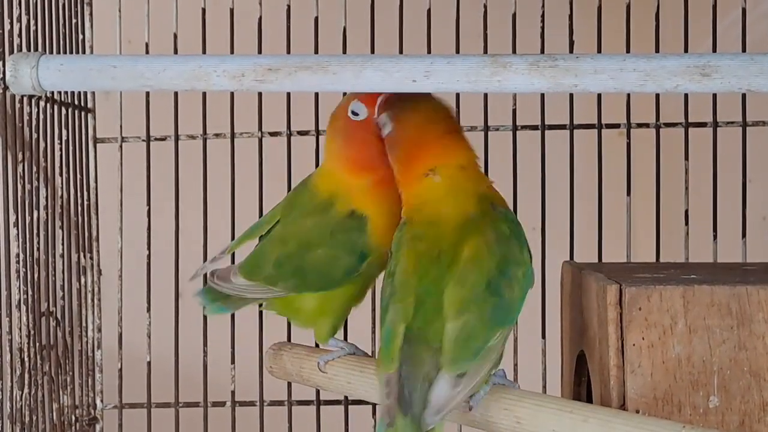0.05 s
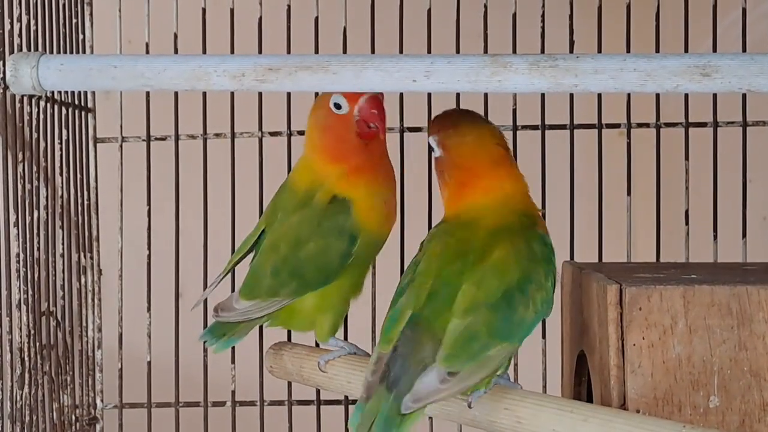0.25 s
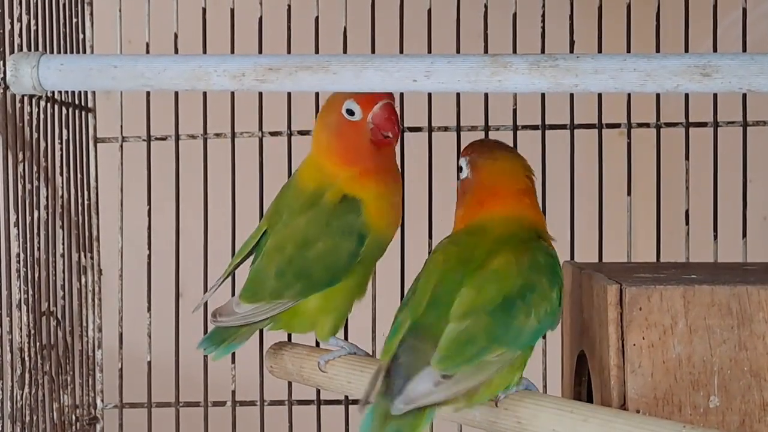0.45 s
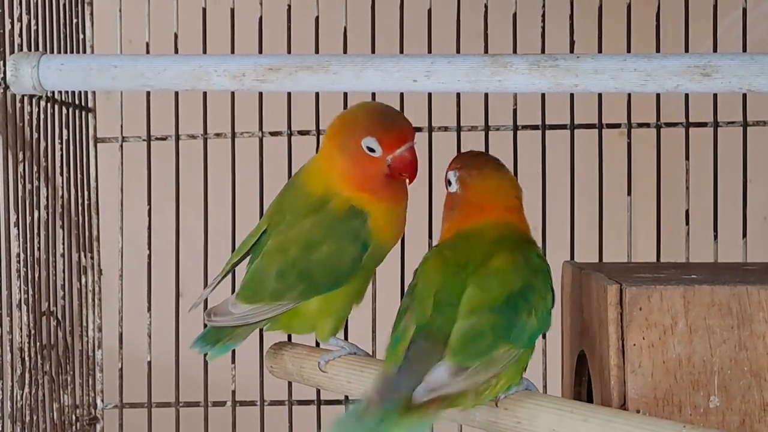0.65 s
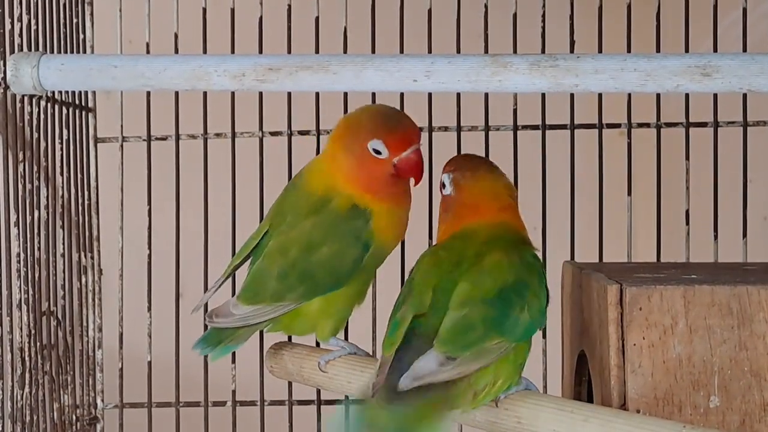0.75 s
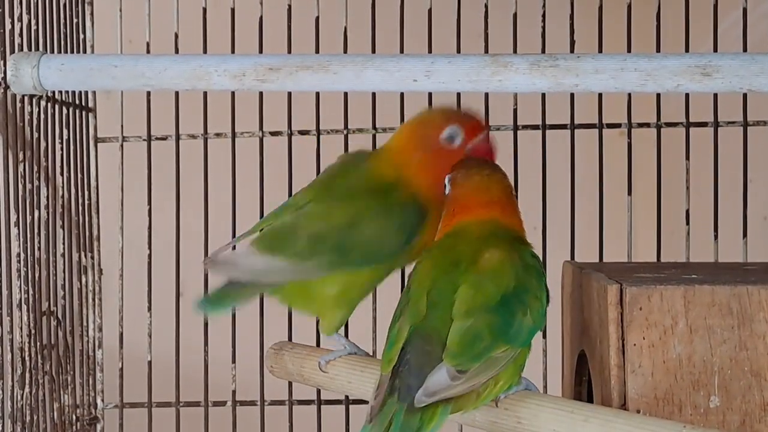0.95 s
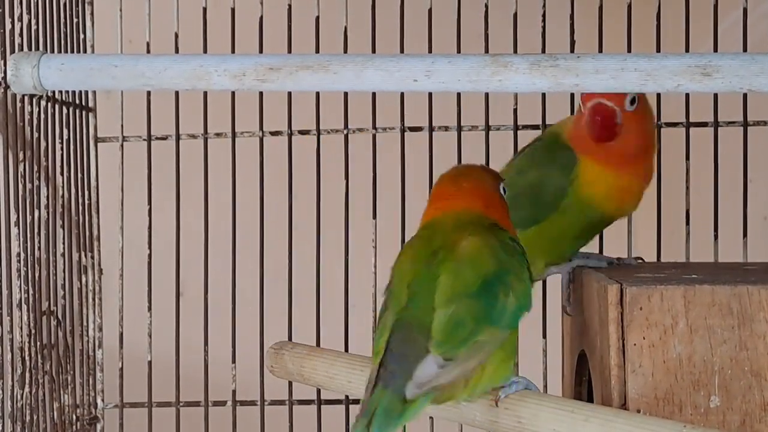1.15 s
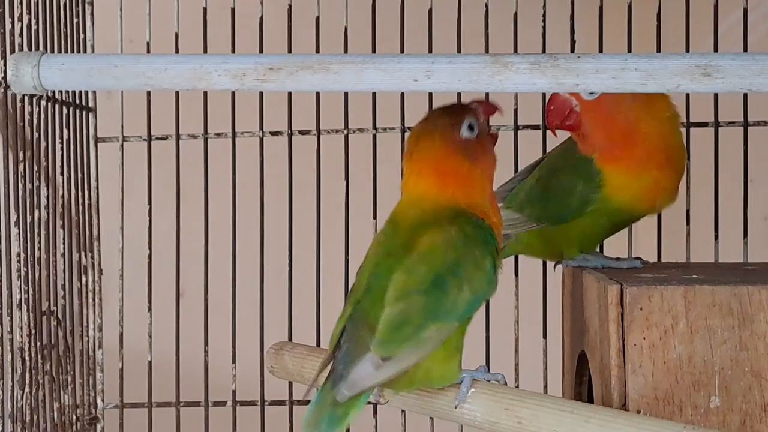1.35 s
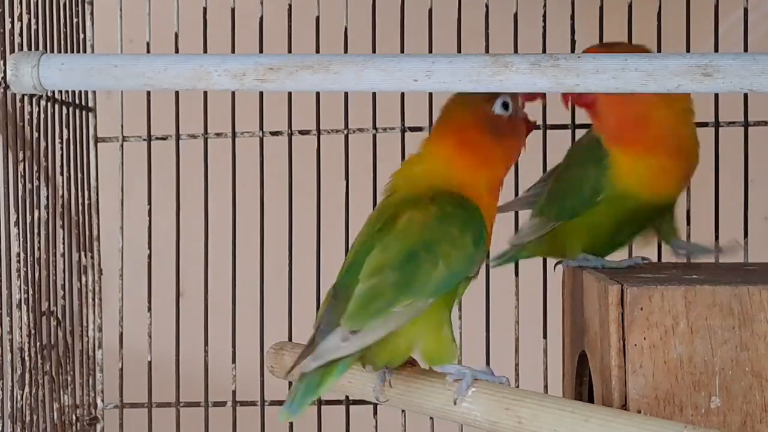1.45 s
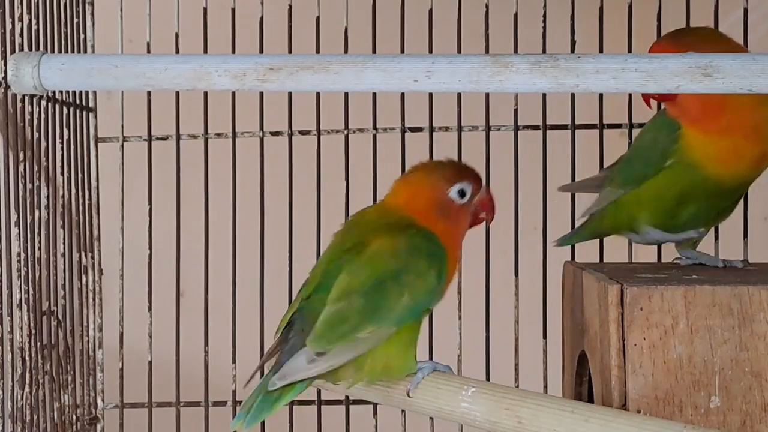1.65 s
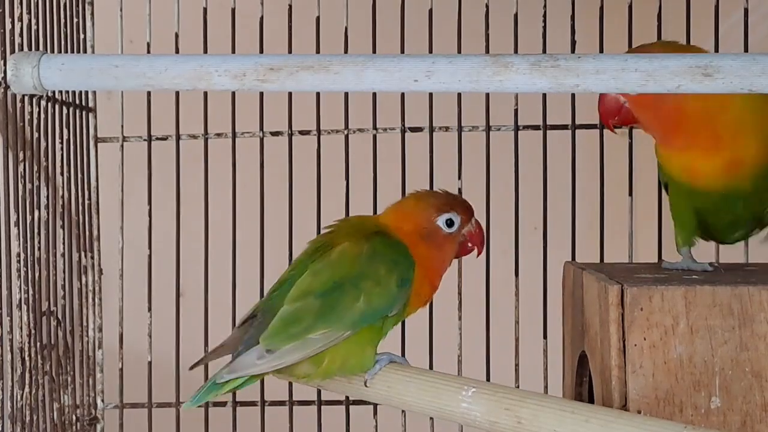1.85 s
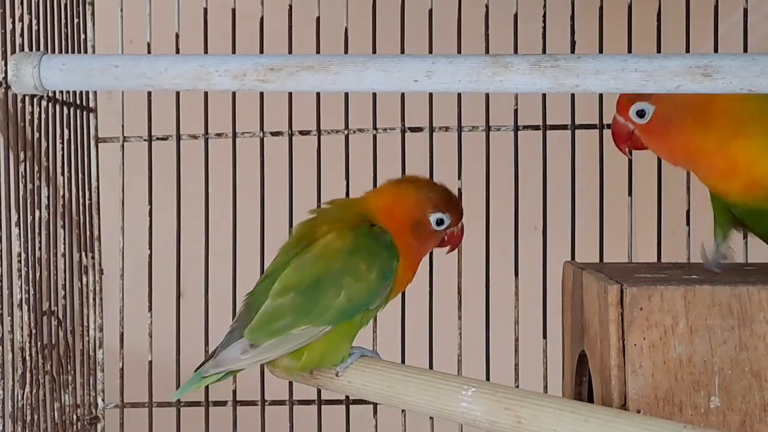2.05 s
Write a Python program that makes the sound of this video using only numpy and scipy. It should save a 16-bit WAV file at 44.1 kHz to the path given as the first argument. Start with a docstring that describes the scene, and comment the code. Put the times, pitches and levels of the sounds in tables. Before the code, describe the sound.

Two small parrots chatter shrilly in a reverberant room. Faint hiss, low rumble and two tiny claw scratches open; from 0.2 seconds one bird fires quick, gliding squeaks. From about 0.8 to 1.4 both overlap, rougher and screechier. After a brief gap with soft wooden foot knocks, sparser calls come at 1.55 to 1.9, then the echo fades and a claw ticks near 2.05.

```python
"""Faint hiss, a low rumble and two claw scratches come first; then two small parrots chatter and shriek.
They sit in a wire cage in a hard-walled room, and feet knock softly on perch and nest box.
Each syllable is a harmonic series on a gliding pitch, with beats, jitter and chaotic noise for roughness.
Early echoes and a reverberant tail follow the voices; gain control ducks the whole scene when it is loud."""
import sys
import numpy as np
from scipy import signal
from scipy.fft import rfft, irfft
from scipy.io import wavfile
from scipy.ndimage import uniform_filter1d, map_coordinates

SR = 44100
rng = np.random.default_rng(int(sys.argv[2]) if len(sys.argv) > 2 else 0)


def dump_mix(stems):
    """Bounce the given channels to the path in sys.argv[1] as a 16-bit WAV at rate SR."""
    frames = np.atleast_2d(stems).T  # one column per channel
    limited = np.clip(frames, -1, 1)  # hard clip at full scale
    pcm = np.round(limited * 32767).astype(np.int16)
    wavfile.write(sys.argv[1], SR, pcm)


N = 92610  # samples, 2.1 s


def amp(db):
    """Level law: 20 dB is a factor of ten in amplitude."""
    return 10 ** (np.asarray(db) / 20)


def evened(x):
    """Normalization to unit rms."""
    return x / np.sqrt(np.mean(x ** 2) + 1e-20)


def read(points, hz):
    """Frequency response interpolated on a logarithmic frequency axis."""
    f, value = np.transpose(points)
    return np.interp(np.log(hz + 1), np.log(f + 1), value)


def add(mix, s, sound):
    """Superposition: a sound starting at s seconds adds to the mix in place."""
    part = mix[round(s * SR):][:len(sound)]
    part += sound[:len(part)]


def high_pass(x, order, hz):
    """Butterworth high-pass: what lies below the corner is attenuated."""
    return signal.sosfilt(signal.butter(order, hz, "high", fs=SR, output="sos"), x)


def wobble(count, width_hz):
    """Random modulation: noise through two equal one-pole low-passes with this corner, unit rms."""
    r = np.exp(-2 * np.pi * width_hz / SR)
    two_poles = np.convolve([1, -r], [1, -r])
    settled = signal.lfilter([1], two_poles, rng.standard_normal(count + 400))[400:]
    return evened(settled)


def first_bird():
    """Voiced source of the first bird: eleven syllables, each with its own roughness and direction."""
    # pitch glides, one list per syllable: (time [s], pitch [Hz], level [dB], harmonic slope [dB/octave])
    song = [
        [(0.193, 3324, -24.5, -2.5), (0.205, 2740, -14.5, -5), (0.219, 1987, -20, -10),
         (0.225, 1790, -20.5, -17.5), (0.239, 1734, -18.5, -17), (0.252, 1820, -18, -18)],
        [(0.257, 2546, -17, -4.5), (0.271, 2542, -18.5, -18), (0.273, 3262, -3, -3.5), (0.275, 4040, -1, -2.5),
         (0.279, 4724, -10.5, -7), (0.287, 5195, -8, -11), (0.289, 3630, -1, 9), (0.291, 2617, -6.5, -1.5),
         (0.315, 2570, -21.5, 4)],
        [(0.403, 2542, -5.5, -31), (0.411, 3444, -21.5, -9), (0.425, 3776, -3, 4), (0.433, 3340, -9, -13),
         (0.441, 2522, -4, -34), (0.445, 2208, -11.5, 13), (0.457, 3594, -11, -3), (0.465, 2703, -20, 2),
         (0.474, 2473, 0, -2.5)],
        [(0.476, 3966, 3, -12), (0.488, 4275, -12, 1.5), (0.506, 4485, -13.5, 4), (0.51, 6216, -11.5, 18),
         (0.512, 6795, -8, -2), (0.522, 6440, -13.5, 12), (0.545, 6500, -20, -3)],
        [(0.574, 1774, -20.5, -27), (0.584, 2288, -20.5, -34), (0.592, 3557, -13, -2.5), (0.6, 4750, -26, 9),
         (0.603, 6360, -10.5, -1), (0.608, 6265, -16, 0), (0.612, 4790, -7.5, -4), (0.617, 4410, -3, -12),
         (0.624, 3783, -5.5, -3), (0.636, 3858, 1, -17), (0.639, 4140, -17, -5), (0.649, 4100, -14, -3)],
        [(0.808, 2460, -5, 8), (0.81, 2365, -14.5, -1.5), (0.838, 3707, -12, -9), (0.85, 4251, -9.5, 2.5),
         (0.87, 4170, -17, 0), (0.876, 3899, -10, -2), (0.886, 3270, -9, -15.5), (0.896, 2896, -14.5, 9),
         (0.908, 2810, -22, 6), (0.925, 2880, -22, 3)],
        [(1.034, 1817, -9, -2), (1.044, 2230, -13.5, -3.5), (1.054, 2375, -11.5, 1.5), (1.06, 6380, -10, -3),
         (1.064, 6600, -18, -3), (1.066, 4570, -12, -5), (1.07, 2760, -16.5, -0.5), (1.084, 2125, -16, -4)],
        [(1.083, 2156, -10, 6), (1.095, 2200, -15.5, -3), (1.117, 2193, -14.5, -7), (1.145, 2222, -14, -4),
         (1.147, 2840, -8.5, -1), (1.151, 4305, -15.5, 6), (1.153, 5110, -3.5, -2), (1.157, 4284, -6, -24),
         (1.188, 4360, -21, 1)],
        [(1.215, 3446, -21, -8), (1.235, 3628, -6, -6), (1.239, 4262, 2.5, -32), (1.245, 4285, -8.5, 6),
         (1.249, 6097, -3.5, -31), (1.255, 5862, -3, -19), (1.269, 3310, -10.5, -5), (1.275, 2280, -8.5, -0.5),
         (1.287, 1990, -17, -8)],
        [(1.35, 2176, -8.5, -4), (1.356, 2016, -22, -11.5), (1.37, 1530, -17, -15), (1.385, 1372, -29, -6)],
        [(1.796, 2780, -17, -10), (1.8, 3730, -6, -1.5), (1.806, 2366, -16.5, -6.5), (1.813, 2086, -9, -7.5),
         (1.816, 3931, -3.5, -18.5), (1.837, 3848, -11, 2.5), (1.843, 2960, -16.5, -9),
         (1.854, 2494, -13, -4.5), (1.872, 2286, -14.5, 0), (1.876, 5900, -10, -8), (1.883, 5810, -27, -10),
         (1.889, 5800, -48, -15)],
    ]
    # one value per syllable: (roughness [0-1])
    roughs = [.08, .3, .12, .15, .09, .42, .2, .22, .18, .08, .11]
    # depth of the beat in each syllable: (depth [0-1])
    flutters = [.2, .7, .2, .45, .2, .6, .3, .4, .6, .2, .1]
    # how much the beak lifts the second harmonic: (gain [dB])
    seconds_db = [-8.5, -0.5, 6.5, -6.5, -2.5, 0.5, 2.5, 1, 4, -4.5, 0.5]
    # direct sound, left minus right, as the head turns: (level difference [dB])
    pans_db = [-11.5, -3.5, -9, -15.5, 4, 2, -12, -3, -3, 0, -14]
    # direct sound, how much later it reaches the left ear: (delay [s])
    lags_s = [-.00007, -.00009, -.00009, -.00009, -.00009, -.00018, -.00005, -.00005, -.00005, .00003,
              .00032]
    return bird(song, roughs, flutters, seconds_db, pans_db, lags_s)


def second_bird():
    """Voiced source of the second bird: nine syllables by the same principle."""
    # pitch glides, one list per syllable: (time [s], pitch [Hz], level [dB], harmonic slope [dB/octave])
    song = [
        [(0.774, 3000, -2.5, -28), (0.782, 2600, -16, 10), (0.804, 2367, -12.5, -2), (0.84, 2384, -20, 13)],
        [(0.872, 2006, -35, 3.6), (0.896, 2073, -12, 4.7), (0.922, 2630, -17, 4), (0.945, 2687, -18.5, 2.7),
         (0.963, 2450, -20, -1.7), (0.985, 2350, -14.5, -0.4)],
        [(0.992, 2019, -2, -16), (1.002, 4750, -13, -9), (1.02, 4800, -3, -5), (1.026, 3450, -13.5, -5),
         (1.042, 3424, -9.5, -5), (1.052, 3440, -9, -18)],
        [(1.1, 2630, -8, -6), (1.116, 2798, -20, 13), (1.138, 2906, -2.5, -7.5)],
        [(1.19, 2230, -11.5, -6), (1.208, 2004, -23, -12.5), (1.222, 2005, -3.5, 3)],
        [(1.289, 2650, -2, 4), (1.295, 3840, -15, -10), (1.305, 3454, -27.5, 6), (1.312, 2530, 0, -9.5)],
        [(1.314, 1907, -34, -11), (1.332, 1635, -13, -3), (1.338, 1790, -52, -13)],
        [(1.558, 3000, -23.5, 3), (1.571, 2718, -16.5, -14.5), (1.594, 2654, -15.5, -1.5),
         (1.599, 2637, -11.5, -13), (1.613, 2588, -9, -6.5), (1.622, 2530, -53, -15)],
        [(1.668, 2490, -24, -14), (1.678, 2455, -6, -25.5), (1.694, 2355, -9.5, -0.5), (1.716, 2620, -11.5, 1),
         (1.735, 2581, -13, 0), (1.748, 2420, -13.5, 0.5), (1.758, 2440, -26, -2)],
    ]
    # one value per syllable: (roughness [0-1])
    roughs = [.55, .6, .6, .2, .45, .25, .3, .25, .13]
    # depth of the beat in each syllable: (depth [0-1])
    flutters = [.5, .5, .5, .4, .4, .3, .3, .35, .6]
    # how much the beak lifts the second harmonic: (gain [dB])
    seconds_db = [10, 10.5, 3.5, 10, 9, 6, -20, -12.5, 2]
    # direct sound, left minus right, as the head turns: (level difference [dB])
    pans_db = [-7.5, -4.5, -5, 1, -2, -5, 1, -15.5, -10]
    # direct sound, how much later it reaches the left ear: (delay [s])
    lags_s = [-.00018, -.00018, -.00018, -.00005, -.00005, .00003, .00003, .00034, .00034]
    return bird(song, roughs, flutters, seconds_db, pans_db, lags_s)


def bird(song, roughs, flutters, seconds_db, pans_db, lags_s):
    """Direct and reflected sound: ear differences place the voice; the small throat passes no lows."""
    direct_db, throat_floor_hz = 1, 1230
    paths = np.zeros((3, N))  # direct left, direct right, feed to the room
    for rows, rough, flutter, second_db, pan_db, lag in zip(song, roughs, flutters, seconds_db, pans_db, lags_s):
        voice = syllable(rows, rough, flutter, second_db)
        start = rows[0][0]
        add(paths[0], start + lag, amp(direct_db + pan_db / 2) * voice)
        add(paths[1], start, amp(direct_db - pan_db / 2) * voice)
        add(paths[2], start, voice)
    paths = high_pass(paths, 6, throat_floor_hz)
    return paths[:2] + room(paths[2])


def syllable(rows, rough, flutter, second_db):
    """Harmonic series under amplitude and frequency modulation; roughness turns it towards chaos."""
    # resonance of the throat: (frequency [Hz], gain [dB])
    throat = [(1200, -19), (2500, 1.5), (4200, 7), (6000, 1.5), (7600, 3), (9500, -3.5), (12500, 0.5),
              (15500, -19)]
    # relative spectrum of the chaotic part of the voice: (frequency [Hz], level [dB])
    screech = [(880, -69), (1500, -53), (2570, -23), (3200, -10), (4300, 7.5), (5300, 9), (6800, -10),
               (9990, -2.5), (12100, -2.5), (15500, -10)]
    beat_hz, beat_drift = 225, .15  # second beat of the voice box, slower than the pitch
    warble = .035  # share by which a full beat also bends the pitch
    # the following hold at full roughness
    jitter_hz, shimmer, rasp_share, rasp_width_hz = 280, .8, 1.1, 270
    screech_db = 3  # against the harmonics
    edge_s = 0.0036

    s, hz, db, slope = np.transpose(rows)
    t = np.arange(s[0], s[-1], 1 / SR)
    n = len(t)
    hz, db, slope = np.interp(t, s, hz), np.interp(t, s, db), np.interp(t, s, slope)

    beat_rate = beat_hz * (1 + beat_drift * wobble(n, 49))
    beat = np.cos(2 * np.pi * (rng.random() + np.cumsum(beat_rate) / SR))
    pitch = hz * (1 + warble * flutter * beat) + jitter_hz * rough * wobble(n, 244)
    phase = 2 * np.pi * np.cumsum(pitch) / SR

    voice, power = np.zeros(n), np.zeros(n)
    for k in range(1, 9):
        gain_db = slope * np.log2(k) + read(throat, k * hz) + second_db * (k == 2)
        gain = amp(gain_db) * (k * hz < .4 * SR)  # mute harmonics near the Nyquist limit
        width = rasp_width_hz * np.sqrt(k)
        # narrow-band noise centred on the harmonic
        rasp = wobble(n, width) * np.cos(k * phase) + wobble(n, width) * np.sin(k * phase)
        share = np.clip(rasp_share * rough * k, 0, 1)  # higher harmonics are noisier
        tone = np.sqrt(2) * np.cos(k * phase + k * k)
        voice += gain * (np.sqrt(1 - share ** 2) * tone + share * rasp)
        power += gain ** 2

    noise_bins = rfft(rng.standard_normal(n))
    chaos = evened(irfft(noise_bins * amp(read(screech, np.fft.rfftfreq(n, 1 / SR))), n))
    voice = voice / np.sqrt(power) + amp(screech_db) * rough ** 2 * chaos
    swell = (1 + flutter * beat) * np.exp(shimmer * rough * wobble(n, 220) / 4)
    edge = np.clip(np.minimum(t - s[0], s[-1] - t) / edge_s, 0, 1)
    return edge * amp(db) * swell * voice


def room(x):
    """Reverberation: early echoes from cage and wall, then sparse taps decaying band by band per ear."""
    # reverberation time: (frequency [Hz], t60 [s])
    decay = [(1500, 0.29), (3000, 0.35), (5000, 0.49), (8000, 0.45), (14000, 0.47)]
    # early reflections, one list per ear: (delay [s], level [dB])
    echoes = [
        [(.0011, -9), (.0034, -4.5), (.0072, -1)],
        [(.0016, -6.5), (.0029, -2.5), (.0088, -4)],
    ]
    tail_db = -4
    # slow random delay wobble that blurs the pitch of the late reverberation
    delay_wobble_s, delay_wobble_hz = .0001, 60

    taps = np.zeros((2, SR))
    # one tap at a random place in every 20 samples, with random sign
    at = np.arange(400, SR - 20, 20) + rng.integers(0, 20, (2, (SR - 401) // 20))
    np.put_along_axis(taps, at, rng.choice([-1., 1.], at.shape), 1)
    hz, t, z = signal.stft(taps, SR, nperseg=256)
    t60 = np.maximum(read(decay, hz), .05)[:, None]
    tail = signal.istft(z * amp(-60 * t / t60), SR, nperseg=256)[1]
    tail *= amp(tail_db) / np.linalg.norm(tail[0])

    late = signal.fftconvolve(x[None], tail, axes=1)[:, :N]
    for ear in late:
        read_at = np.arange(N) + delay_wobble_s * SR * wobble(N, delay_wobble_hz)
        ear[:] = map_coordinates(ear.copy(), [read_at], order=3)
    early = np.zeros((2, 1000))
    for ear, reflections in zip(early, echoes):
        for s, db in reflections:
            add(ear, s, amp([db]))
    return late + signal.fftconvolve(x[None], early, axes=1)[:, :N]


def knocks():
    """Modal ringing: soft blows of feet on perch and nest box excite damped modes of the wood."""
    # blows: (time [s], level [dB])
    blows = [(0.244, -28), (0.26, -29.5), (1.335, -29), (1.559, -38.5), (1.587, -26), (1.617, -28.5),
             (1.66, -33)]
    # modes of the wood: (frequency [Hz], relative level [dB], t60 [s])
    modes = [(266.3, 7, 0.27), (405, 11, 0.031), (625, 6.5, 0.031), (893, 9, 0.034), (1516, -11, 0.16)]
    out, t = np.zeros(N), np.arange(5000) / SR
    onset = np.minimum(t / 0.0013, 1)
    for s, db in blows:
        ring = np.zeros(len(t))
        for hz, mode_db, t60 in modes:
            ring += amp(mode_db - 60 * t / t60) * np.sin(2 * np.pi * (hz * t + rng.random()))
        add(out, s, amp(db) * onset * ring / 2)
    return out


def ticks():
    """Friction transients: claws on the perch give short, exponentially decaying bright noise."""
    # scratches: (time [s], relative level [dB])
    scratches = [(0.0273, -30.5), (0.058, -32), (2.044, -28)]
    floor_hz, decay_s = 3850, 0.0076
    out, t = np.zeros(N), np.arange(1500) / SR
    for s, db in scratches:
        add(out, s, amp(db) * np.exp(-t / decay_s) * rng.standard_normal(len(t)) / 2)
    return high_pass(out, 2, floor_hz)


def hush():
    """Partly coherent stereo noise: faint hiss, and a low rumble that swells and sinks."""
    # relative spectrum of the background: (frequency [Hz], level [dB])
    spectrum = [(12, -27), (20, -8.5), (98, 3.5), (581, -21), (1170, -25), (2150, -29), (3860, -35),
                (4190, -35), (15500, -42.5)]
    # left-right correlation: (frequency [Hz], coherence [-1 to 1])
    coherence = [(60, 1), (380, 0.77), (2380, -0.48), (15000, -0.18)]
    # course of the low rumble, relative to its mean: (time [s], level [dB])
    rumble = [(0.0, -27), (0.22, -26.5), (0.54, -41.5), (0.788, -31.5), (0.86, -46), (0.969, -30.5),
              (1.29, -44.5), (1.33, -33), (1.65, -24.5), (1.72, -40), (2.1, -32)]
    level_db, rumble_mean_db, rumble_top_hz = -26.5, -29.5, 820

    frames, hz = N // 256 + 5, np.fft.rfftfreq(1024, 1 / SR)
    a, b, c, d = rng.standard_normal((frames, 513, 4)).T
    same = np.clip(read(coherence, hz), -1, 1)[:, None]
    left = a + 1j * b
    right = same * left + np.sqrt(1 - same ** 2) * (c + 1j * d)
    z = np.array([left, right]) * amp(read(spectrum, hz))[:, None]

    s, db = np.transpose(rumble)
    swell_db = np.interp(np.arange(frames) * 256 / SR, s, db) - rumble_mean_db
    low_share = 1 / (1 + (hz[:, None] / rumble_top_hz) ** 2)  # the swell fades out towards the treble
    z *= amp(swell_db * low_share) / np.sqrt(np.mean(abs(z) ** 2))
    noise = signal.istft(z, nperseg=1024, noverlap=768)[1][:, :N]
    return amp(level_db) * noise / np.sqrt(340)


def scene():
    """Linear superposition of both birds, the knocks, the scratches and the background."""
    return first_bird() + second_bird() + knocks() + ticks() + hush()


def record(dry):
    """Dynamic compression: bass roll-off, quick ducking with slow recovery, hard ceiling, band limit."""
    bass_floor_hz, treble_top_hz, ceiling = 35, 15600, .94
    knee_db, squeeze = -15, 0.43  # squeeze: share of the excess level that is taken away
    follower_fall = 68.5  # dB per second, of the tracked level
    dry = high_pass(dry, 2, bass_floor_hz)
    power_db = 10 * np.log10(abs(uniform_filter1d((dry ** 2).mean(0), 300)) + 1e-12)
    # a peak follower: rises at once, falls at a steady rate
    fall = np.arange(N) * follower_fall / SR
    tracked_db = np.maximum.accumulate(power_db + fall) - fall
    over_db = np.maximum(tracked_db - knee_db, 0)
    ducked = dry / amp(squeeze * uniform_filter1d(over_db, 200))
    clipped = np.clip(ducked, -ceiling, ceiling)
    low_pass = signal.firwin(511, treble_top_hz, window=("kaiser", 9), fs=SR)
    return signal.oaconvolve(clipped, low_pass[None], "same")


dry = scene()
out = record(dry)
dump_mix(out)
```